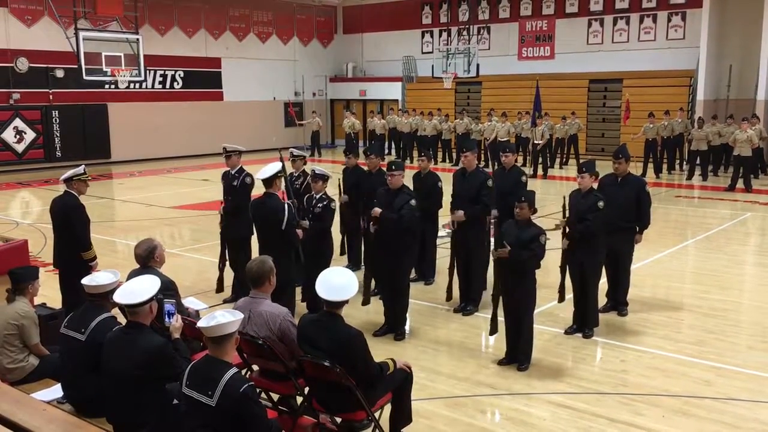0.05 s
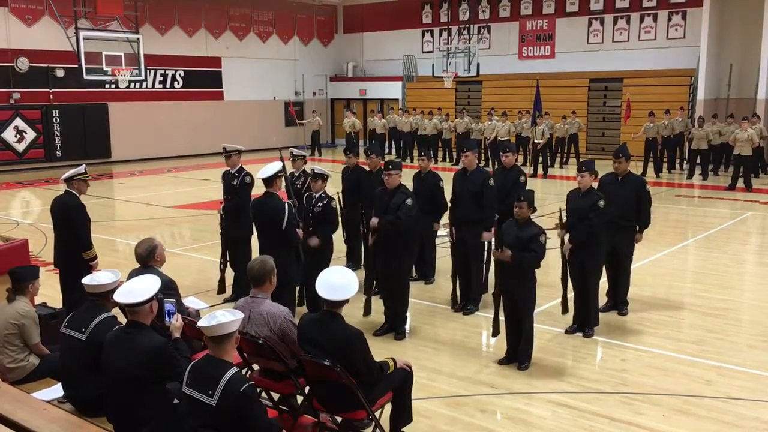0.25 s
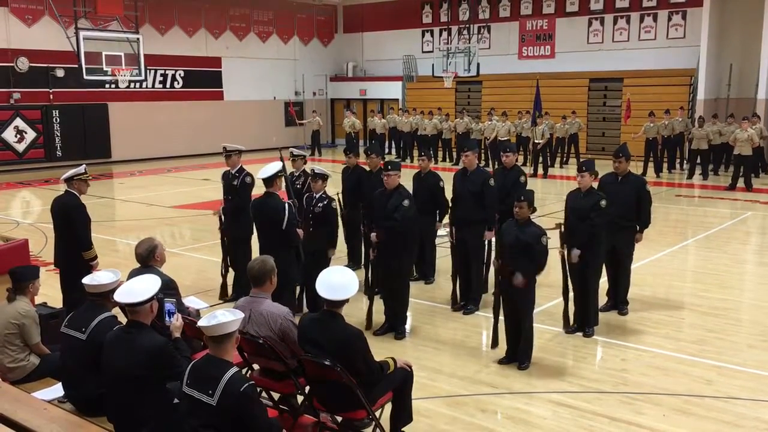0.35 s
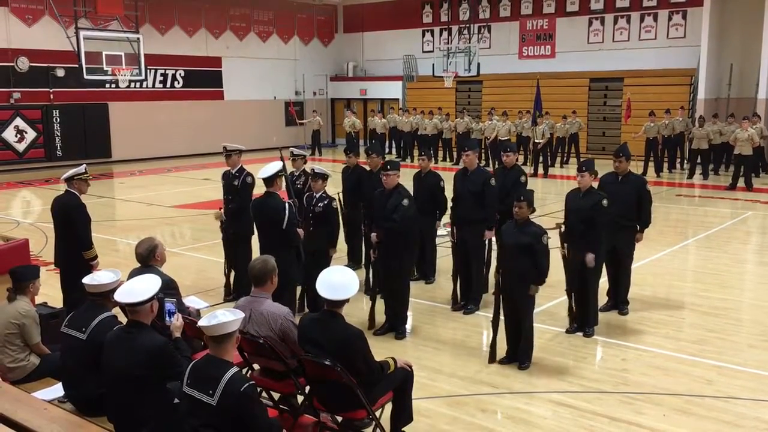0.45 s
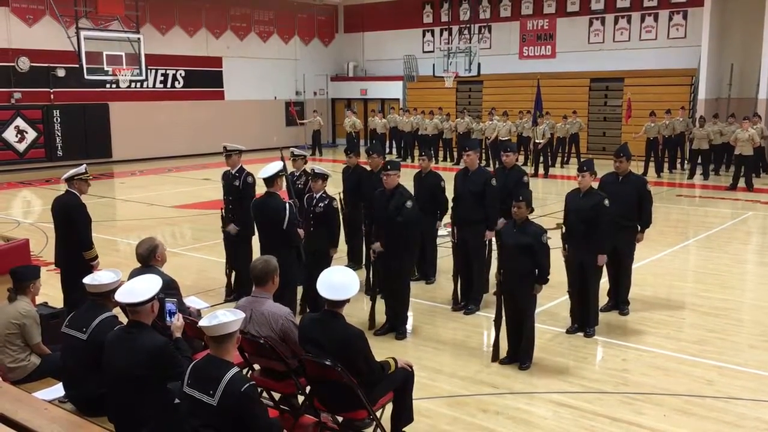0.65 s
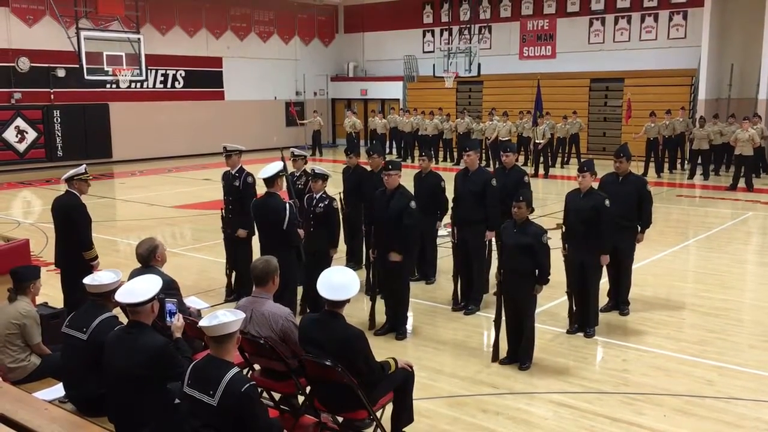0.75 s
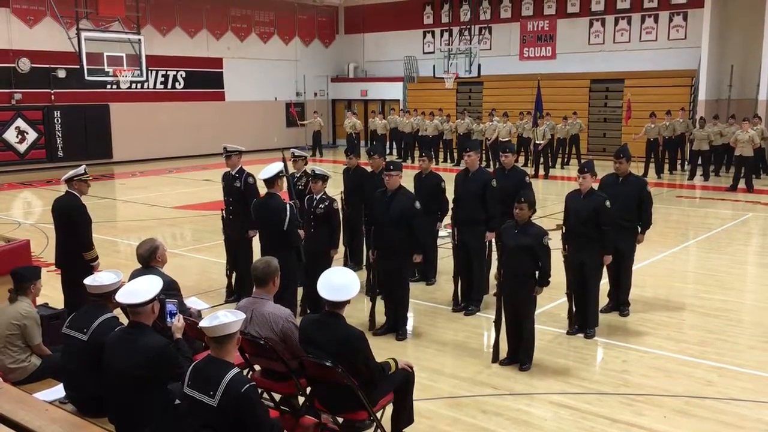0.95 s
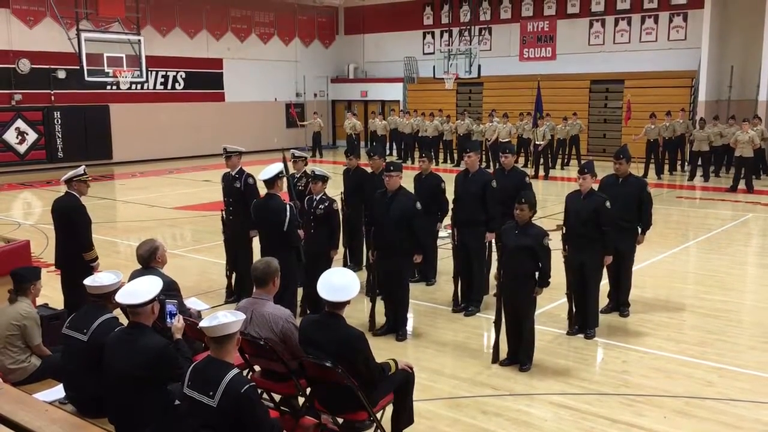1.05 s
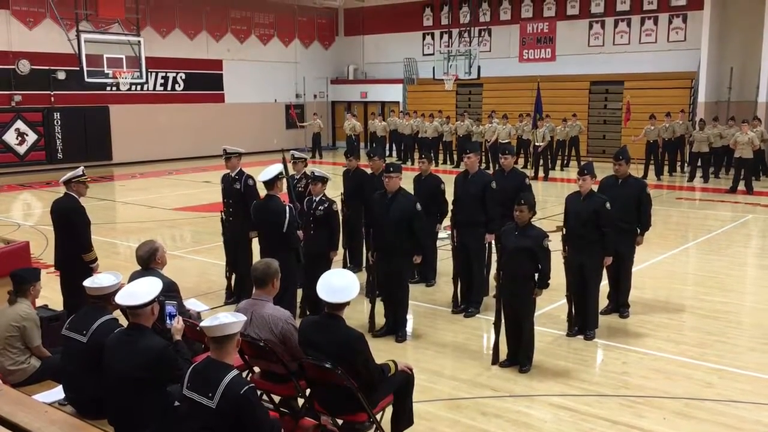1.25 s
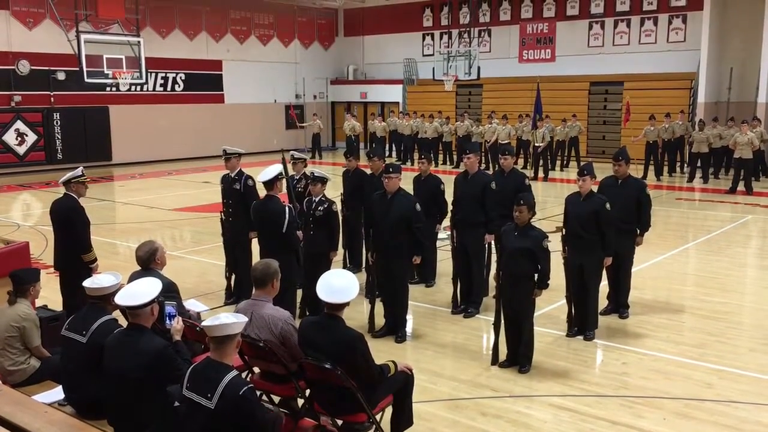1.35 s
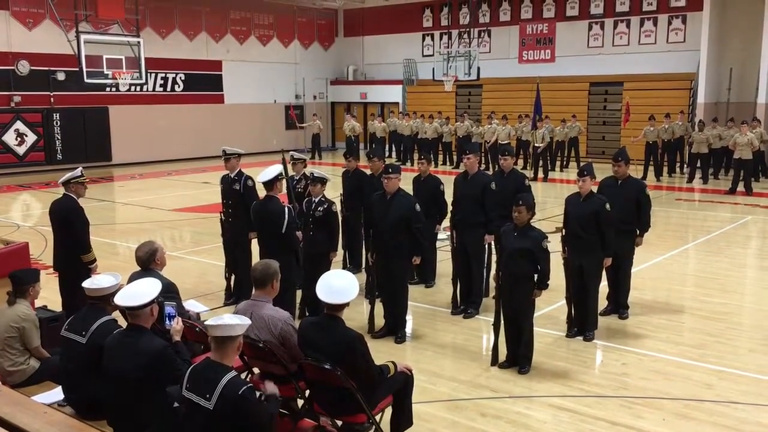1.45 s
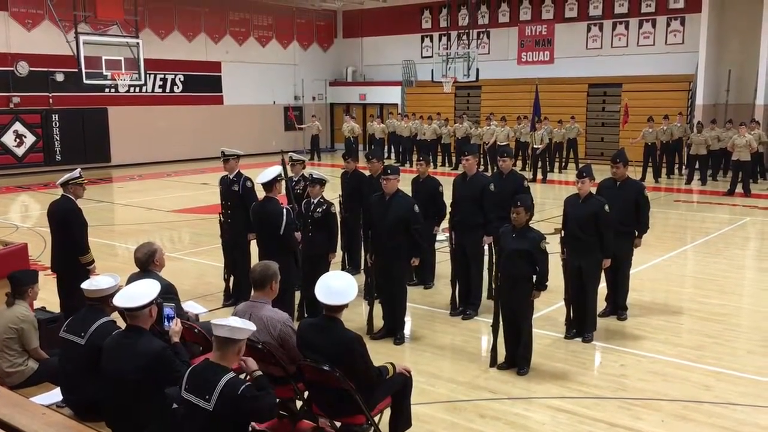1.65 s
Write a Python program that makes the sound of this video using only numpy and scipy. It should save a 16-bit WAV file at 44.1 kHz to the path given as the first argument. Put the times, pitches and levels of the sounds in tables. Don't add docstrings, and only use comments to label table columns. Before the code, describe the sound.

Rifle butts are grounded on a sprung wooden gym floor. Slight webbing scrape and metal ticks at 0.07-0.16 s, then three ragged volleys of hollow thumps with hard clacks near 0.23, 0.32 and 0.47-0.53 s. High swivel ticks ring until about 0.9 s. Dull wall slaps return until 1.2 s as the large hall's boom fades into low ventilation rumble, picked up at a distance.

```python
import sys
import numpy as np
from scipy import signal
from scipy.fft import rfft, irfft
from scipy.io import wavfile
from scipy.ndimage import uniform_filter1d

SR = 44100
rng = np.random.default_rng(int(sys.argv[2]) if len(sys.argv) > 2 else 0)


def generate_wav(signal):
    frames = np.transpose(np.atleast_2d(signal))
    scaled = np.clip(frames, -1, 1) * 32767
    pcm = np.round(scaled).astype(np.int16)
    wavfile.write(sys.argv[1], SR, pcm)


def gain_from_db(level_db):
    decades = np.asarray(level_db, float) / 20
    return 10 ** decades


N = 74970

# freq_hz [Hz], t60_s [s]
HALL_T60 = [(60, 3.66), (150, 2.41), (350, 1.36), (1000, 1.34), (3000, 1.433), (6000, 1.05), (10000, 0.81),
            (16000, 0.5)]
# freq_hz [Hz], density_db [dB per Hz]
CLACK_SPECTRUM = [(240, -20), (400, -7), (777, -5), (2220, -13), (2840, -16), (3370, -14.5), (6640, -18),
                  (7400, -21), (16000, -23)]
# freq_hz [Hz], level_db [dB]
TICK_SPECTRUM = [(700, -9), (1600, 0), (2700, -7), (4500, -3), (6500, -1.5), (9000, -12), (12000, -8.5),
                 (16000, -18)]


def read(points, hz):
    freq_hz, value = np.transpose(points)
    return np.interp(np.log(hz + 1), np.log(freq_hz + 1), value)


def evened(x):
    return x / np.sqrt(np.mean(x ** 2) + 1e-20)


def coloured(x, points):
    gain = gain_from_db(read(points, np.fft.rfftfreq(len(x), 1 / SR)))
    return irfft(rfft(x) * gain, len(x))


def resonate(x, hz, width_hz):
    r = np.exp(-np.pi * width_hz / SR)
    pole = r * np.exp(2j * np.pi * hz / SR)
    return 2 * signal.lfilter([1 - r], [1, -pole], x).real


def add(mix, start_s, sound):
    part = mix[round(start_s * SR):][:len(sound)]
    part += sound[:len(part)]


def ventilation():
    # freq_hz [Hz], density_db [dB per Hz]
    air_spectrum = [(12, 2), (20, -2), (77, -2), (216, -12), (277, -24.5), (1260, -39.5), (2600, -44.5),
                    (3950, -52.5), (16000, -66.5)]
    duct_hz, duct_width_hz, duct_db = 58.7, 23.3, -43
    hum_hz, hum_db = 60.8, -39
    duct = rng.standard_normal(N)
    for _ in range(2):
        duct = resonate(duct, duct_hz, duct_width_hz)
    air = coloured(rng.standard_normal(N), air_spectrum)
    hum = np.sqrt(2) * np.sin(2 * np.pi * hum_hz * np.arange(N) / SR)
    return gain_from_db(hum_db) * hum + gain_from_db(-42.5) * evened(air) + gain_from_db(duct_db) * evened(duct)


def earlier_echo():
    noise = evened(coloured(rng.standard_normal(N), CLACK_SPECTRUM))
    hz, t, z = signal.stft(noise, SR, nperseg=512)
    decay = gain_from_db(-61.5 - 60 * t / read(HALL_T60, hz)[:, None])
    return signal.istft(z * decay, SR, nperseg=512)[1][:N]


def hall(x):
    # freq_hz [Hz], level_db [dB]
    wet = [(50, 0), (100, 2.5), (200, -1), (400, -3), (1000, -2.5), (3000, 1), (7000, -2), (15000, -4.5)]
    spacing, build_s = 20, 0.012
    taps = np.zeros(N)
    at = np.arange(200, N - spacing, spacing)
    taps[at + rng.integers(0, spacing, len(at))] = rng.choice([-1., 1.], len(at))
    hz, t, z = signal.stft(taps, SR, nperseg=1024)
    t60 = read(HALL_T60, hz)[:, None]
    unit_energy = np.sqrt(2 * np.log(1000) * spacing / SR / t60)
    z = z * gain_from_db(read(wet, hz)[:, None] - 60 * t / t60) * unit_energy
    tail = signal.istft(z, SR, nperseg=1024)[1][:N]
    tail *= 1 - np.exp(-np.arange(N) / SR / build_s)
    return signal.fftconvolve(x, tail)[:N]


def rustle():
    u = np.arange(8192) / SR / 0.045
    grains = gain_from_db(1.8 * evened(uniform_filter1d(rng.standard_normal(len(u)), size=120)))
    scrape = evened(coloured(rng.standard_normal(len(u)), TICK_SPECTRUM))
    return gain_from_db(-50.5) * scrape * grains * np.sqrt(u) * np.exp(-u ** 2)


def knock(ring_db, tick_db, tick_hz):
    # freq_hz [Hz], level_db [dB], t60_s [s]
    swivel = [(13320, 0, .22), (13262, -8, .2), (8720, -16, .08), (11170, -22, .1)]
    tick_s, attack_s, tick_q = 0.0046, 0.00065, 15
    t = np.arange(16384) / SR
    ring = sum(gain_from_db(db - 60 * t / t60) * np.sin(2 * np.pi * f * t) for f, db, t60 in swivel)
    snap = rng.standard_normal(len(t))
    tick = evened(coloured(snap, TICK_SPECTRUM)) + evened(resonate(snap, tick_hz, tick_hz / tick_q))
    tick = tick * np.exp(-t / tick_s) * np.minimum(t / attack_s, 1)
    return gain_from_db(ring_db) * ring, gain_from_db(tick_db) * tick


def slings():
    # start_s [s], ring_db [dB], tick_db [dB], tick_hz [Hz]
    knocks = [(0.0654, -48.5, -51.5, 6360), (0.071, -70, -48.5, 1670), (.077, -73, -52, 8900),
              (.099, -55, -57, 8100), (0.0989, -68, -45.5, 1390), (0.1182, -59, -57.5, 4450),
              (.1635, -91, -60, 6950), (.509, -48, -36, 8560), (0.5905, -48, -40.5, 6700),
              (0.6612, -58, -43, 11300), (0.711, -73, -48.5, 5050), (.800, -67, -49, 6000),
              (.827, -61, -58.5, 12160), (.853, -74, -73, 9200), (0.882, -50, -58.5, 9600),
              (1.533, -95, -70.5, 4180), (1.632, -80, -71.5, 6000)]
    rings, ticks = np.zeros((2, N))
    add(ticks, 0.066, rustle())
    for start_s, ring_db, tick_db, tick_hz in knocks:
        ring, tick = knock(ring_db, tick_db, tick_hz)
        add(rings, start_s, ring)
        add(ticks, start_s, tick)
    return rings, ticks


def thump(db, hz):
    rise_s, decay_cycles, sag_s = 0.0016, 0.99, 0.01303
    t = np.arange(4096) / SR
    turns = hz * sag_s * np.log1p(t / sag_s)
    envelope = (1 - np.exp(-t / rise_s)) * np.exp(-turns / decay_cycles)
    return gain_from_db(db) * 2 * envelope * np.sin(2 * np.pi * turns)


def low_slaps():
    # start_s [s], level_db [dB],
    # pitch_hz [Hz]
    slaps = [(.262, -18.5, 138), (.29, -22, 106), (0.343, -23, 72.6), (0.477, -19.5, 73),
             (0.724, -19.5, 100.9), (0.789, -16, 116), (0.868, -20, 108.6), (0.899, -15, 104.5),
             (1.075, -19, 89.24), (1.206, -23, 88), (1.512, -33, 62)]
    out = np.zeros(N)
    for start_s, level_db, pitch_hz in slaps:
        add(out, start_s, resonate(thump(level_db, pitch_hz), pitch_hz, pitch_hz))
    return out


def clack(db, hz):
    stock_share, stock_q, mode_db = 0.42, 10, 2
    attack_s, clack_s, rattle_s, rattle_db = 0.00068, 0.0025, 0.014, -10
    t = np.arange(4096) / SR
    roughness_db = 2.5 * evened(uniform_filter1d(rng.standard_normal(len(t)), size=30))
    grit = rng.standard_normal(len(t)) * gain_from_db(roughness_db)
    wide = evened(coloured(grit, CLACK_SPECTRUM))
    dulling_hz = min(4 * hz, SR / 2.5)
    wide = signal.lfilter(*signal.butter(1, dulling_hz, fs=SR), wide)
    mode = np.sin(2 * np.pi * hz * t) * np.exp(-t / rattle_s)
    rung = evened(resonate(grit, hz, hz / stock_q)) + gain_from_db(mode_db) * mode
    fade = np.exp(-t / clack_s) + gain_from_db(rattle_db) * np.exp(-t / rattle_s)
    body = stock_share * rung + (1 - stock_share) * wide
    return gain_from_db(db) * body * np.minimum(t / attack_s, 1) * fade


def rifle_butts():
    # start_s [s], thump_db [dB], thump_hz [Hz], clack_db [dB], clack_hz [Hz]
    blows = [(.228, -38, 195, -37.5, 1100), (0.2327, -14, 605, -18.5, 1423), (0.234, -10.5, 355, -25, 6230),
             (0.2377, -21.5, 270, -23, 4470), (0.2416, -36, 247, -28.5, 6300),
             (0.248, -13, 236, -23.5, 6650), (0.305, -16, 231.5, -29.5, 1170),
             (0.3121, -14.5, 285, -21, 1584), (.3175, -30.5, 250, -21.5, 1554),
             (0.3155, -22, 248, -23.5, 4310), (0.326, -16.5, 241, -27.5, 3530),
             (.329, -17.5, 266, -26.5, 6350), (.335, -8.5, 213, -29, 4400), (0.4729, -6, 259, -22, 1030),
             (0.4781, -15, 166, -23.5, 2130), (0.4867, -12.5, 132, -21, 2210),
             (0.4797, -33, 198.3, -28, 12600), (0.4854, -30, 153, -26.5, 9300),
             (0.4929, -16, 213, -23, 5900), (.4985, -10, 208.5, -25, 1550),
             (0.5021, -7, 240.7, -20.5, 1887), (.504, -29, 234, -23, 3656), (.517, -22.5, 165.6, -26, 1523),
             (.533, -14, 172.8, -29.5, 1920)]
    out = np.zeros(N)
    for start_s, thump_db, thump_hz, clack_db, clack_hz in blows:
        add(out, start_s, thump(thump_db, thump_hz) + clack(clack_db, clack_hz))
    return out


def scene():
    butts = rifle_butts()
    rings, ticks = slings()
    direct = butts + rings + ticks
    reverberant = hall(butts + gain_from_db(-1.5) * ticks)
    mix = direct + low_slaps() + reverberant + earlier_echo() + ventilation()
    return mix[None]


def low_pass(x):
    return signal.sosfilt(signal.butter(12, 16430, fs=SR, output="sos"), x)


def record(dry):
    # freq_hz [Hz], width_hz [Hz], share taken out [0-1]
    mic_dips = [(757, 140, 0.46), (2690, 620, 0.34)]
    bass_cut = signal.butter(3, 45.3, "high", fs=SR, output="sos")
    x = signal.sosfilt(bass_cut, dry)
    x = x - sum(share * resonate(x, hz, width_hz) for hz, width_hz, share in mic_dips)
    band_limit = signal.firwin(255, 15900, window=("kaiser", 9), fs=SR)
    x = signal.oaconvolve(x, band_limit[None], "same")
    return low_pass(x)


dry = scene()
out = record(dry)
generate_wav(out)
```